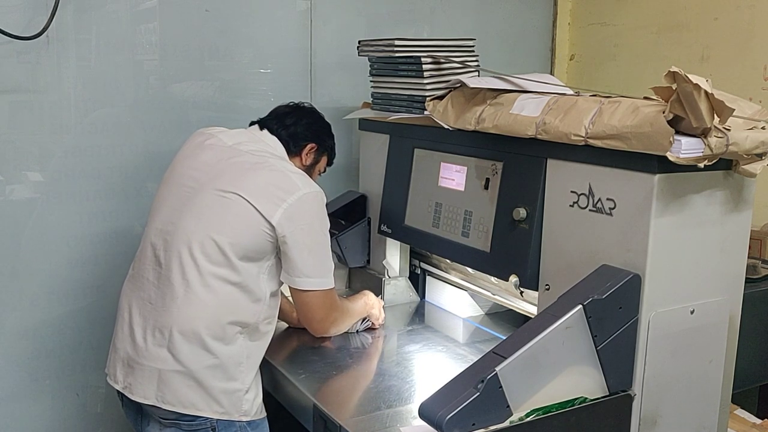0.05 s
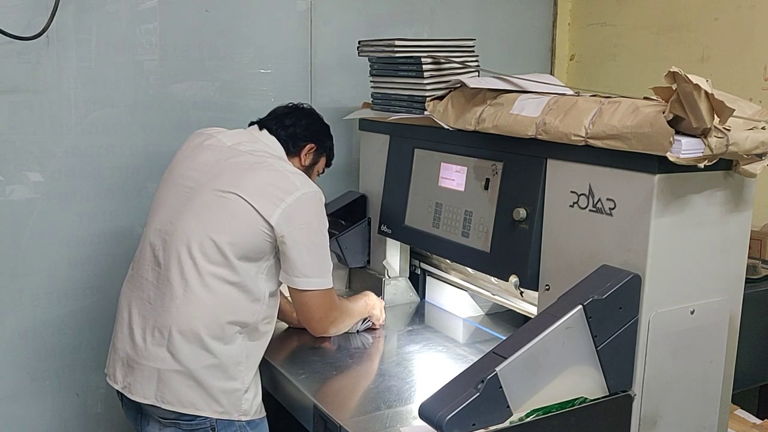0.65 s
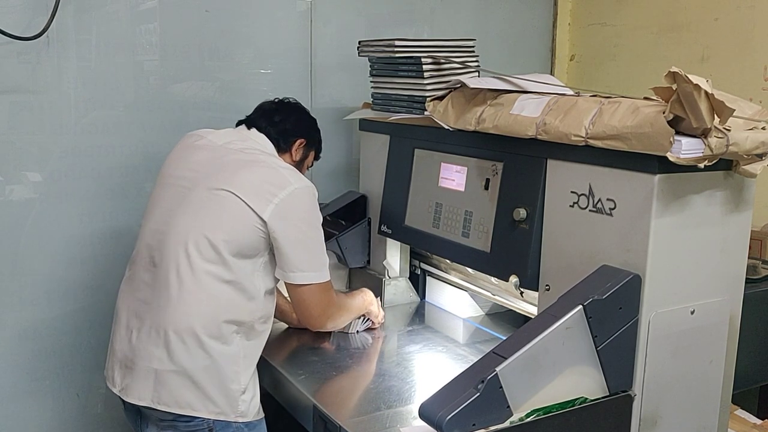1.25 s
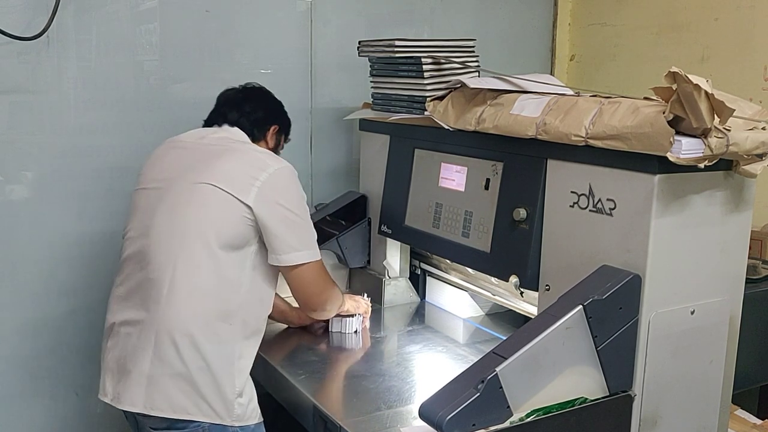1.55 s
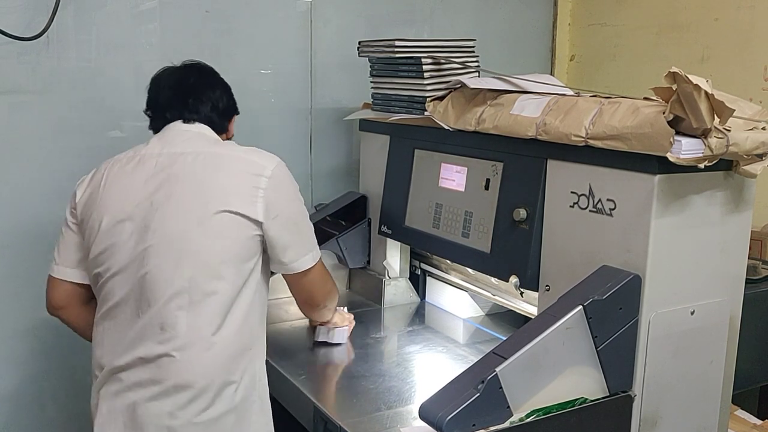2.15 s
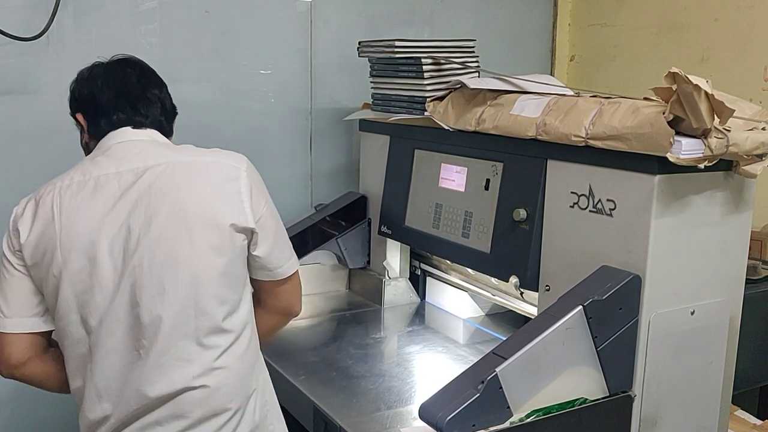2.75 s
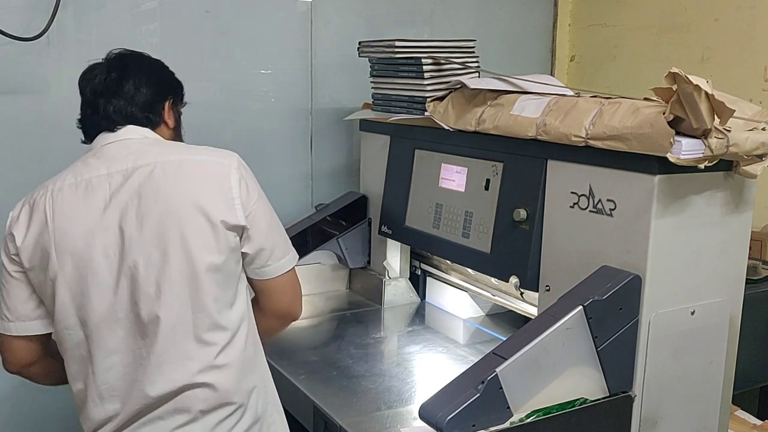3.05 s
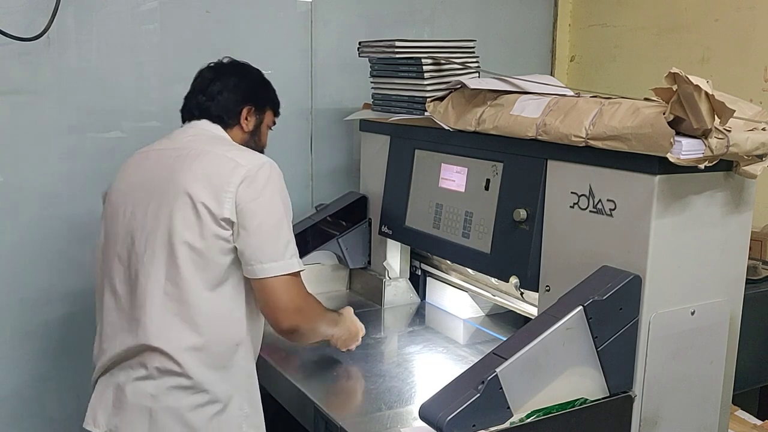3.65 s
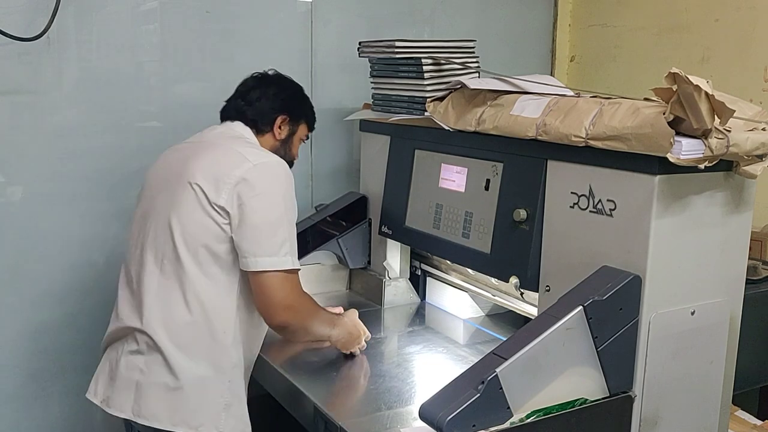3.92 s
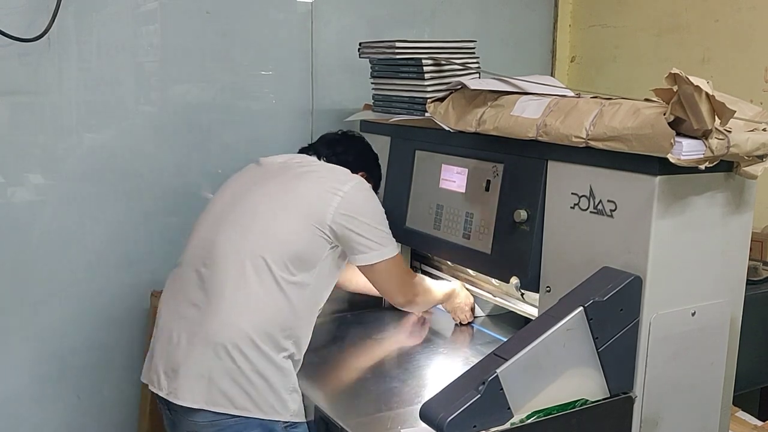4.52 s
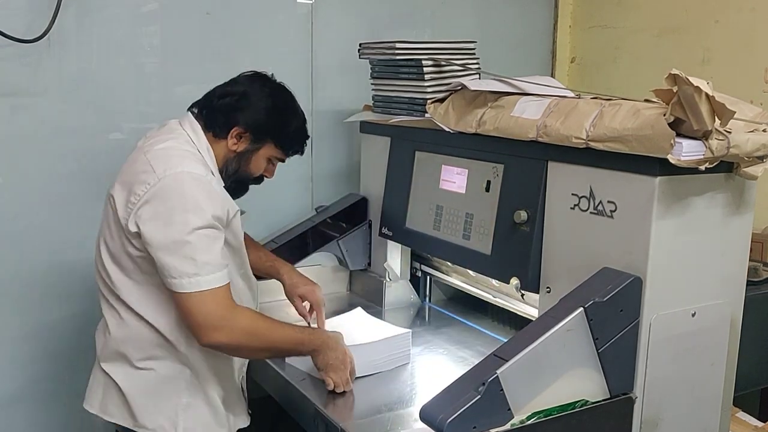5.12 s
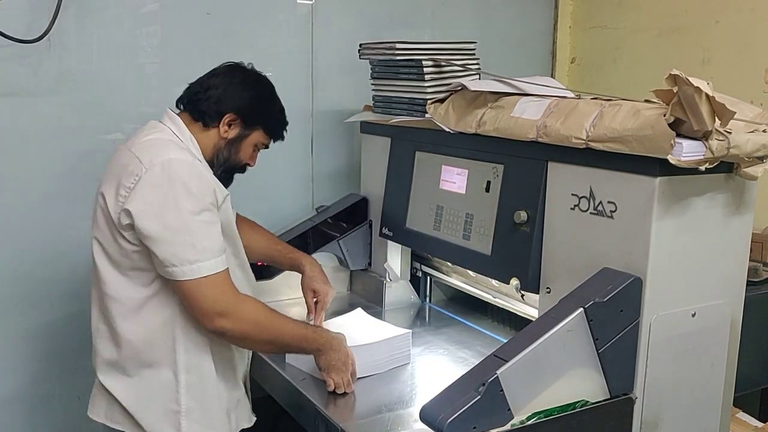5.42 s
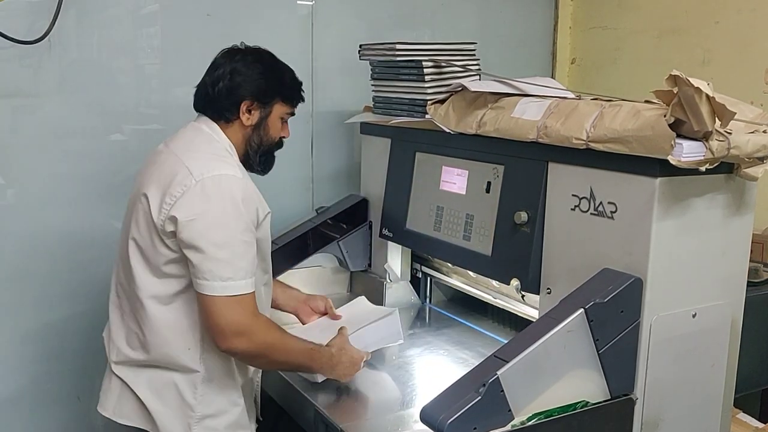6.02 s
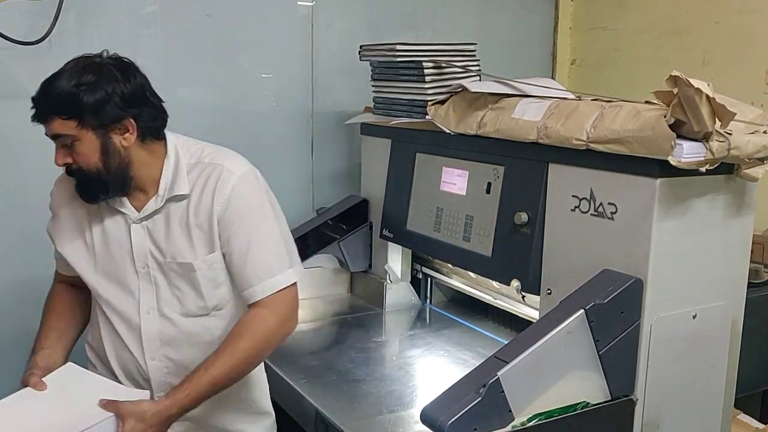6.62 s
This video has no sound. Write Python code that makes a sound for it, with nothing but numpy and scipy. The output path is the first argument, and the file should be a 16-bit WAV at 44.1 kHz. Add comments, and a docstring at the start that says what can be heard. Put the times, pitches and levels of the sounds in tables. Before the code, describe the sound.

A cutting machine's motor and fan hum throughout in a small, hard-walled room. After some soft rubbing, a block of paper slaps onto the steel table, which rings briefly. Another block is shoved across with a short scrape. Hands and sheets rustle lightly, then a thick stack is knocked twice on its edge, the second time harder, and brushes away as it is lifted. The sound is in stereo with a short echo.

```python
"""Paper blocks on a steel table

In a small, hard-walled print shop, a cutting machine's motor and fan hum throughout.
One block of paper is slapped onto its steel table, which rings; another is shoved across and scrapes.
A thick stack is gathered, knocked twice on its edge and lifted off. Hands and sheets rustle in between."""
import sys
import numpy as np
from scipy import signal
from scipy.fft import rfft, irfft, next_fast_len
from scipy.io import wavfile

SR = 44100
rng = np.random.default_rng(int(sys.argv[2]) if len(sys.argv) > 2 else 0)


def inscribe(sig):
    """Save sig as 16-bit PCM at rate SR to the path in sys.argv[1].

    A 1-D sig is mono; a 2-D sig holds one channel per row.
    Samples are clipped to [-1, 1] before scaling.
    """
    pcm = np.round(np.clip(np.atleast_2d(sig).T, -1, 1) * 32767)
    wavfile.write(sys.argv[1], SR, pcm.astype(np.int16))


N = 298597
TIME = np.arange(N) / SR
TOP_HZ, ROOM_FADE_S = 15900, 0.53   # a "fade" is the time a sound takes to drop by 60 dB
# how much left and right differ: (frequency [Hz], difference against what they share [dB])
STEREO_WIDTH = [(60, -20), (170, -17), (280, -12), (600, -6), (1100, 0), (4000, 0), (15000, 0)]

# the motor's tones: (frequency [Hz], level [dB])
MOTOR_TONES = [(120.2, -59), (157.5, -57), (240.2, -73.5), (296.6, -66), (549.5, -64), (740.7, -72.5)]
# a "colour" says how strong lows and highs are; fan and air: (frequency [Hz], relative level [dB])
FAN_COLOUR = [(15, -38), (25, -11), (92, -3.5), (162, -3), (182, -5.5), (310, -8), (555, -12), (694, -15),
              (756, -15), (1500, -28.5), (1950, -62), (3300, -120)]
AIR_COLOUR = [(880, -9.5), (1500, -4.5), (1620, -0.5), (2410, -5), (3350, -9), (3770, -10.5), (5660, -10.5),
              (8490, -20), (15200, -20), (16000, -25)]

# small contacts, snaps and rubs: (time [s], level [dB], centre [Hz], width [Hz], rise [s], fade [s])
TOUCH_EVENTS = [(0.3, -49, 446, 447, 0.14, 1.2), (0.868, -42, 275, 100, 0.073, 0.59),
                (1.32, -54, 1420, 600, 0.042, 0.6), (1.9315, -25, 6000, 2980, 0.00085, 0.027),
                (1.9383, -21.5, 5600, 3000, 0.0017, 0.021), (1.937, -35, 13600, 4110, 0.004, 0.07),
                (3.076, -55, 6800, 1000, 0.0075, 0.34), (3.724, -49, 13600, 4500, 0.015, 0.14),
                (3.974, -49.5, 1300, 900, 0.0068, 0.046), (4.216, -58.5, 6200, 2200, 0.016, 0.09),
                (5.095, -53, 1550, 500, 0.019, 0.15), (5.716, -40.5, 372, 35, 0.025, 0.067)]
# hands and sheets brushing: (time [s], rise [s], fade [s], level [dB], brightness [dB])
# brightness is below 0 for a flat hand, above 0 for sheet edges
BRUSH_STROKES = [(0.885, 0.038, 0.64, -59, -10), (1.315, 0.026, 0.98, -56, -4.5), (1.505, 0.021, 1, -58, 1),
                 (1.906, 0.034, 0.091, -34.5, 0.5), (2.92, 0.098, 0.95, -65, 3),
                 (3.074, 0.008, 0.28, -58.5, 10), (4.216, 0.012, 0.15, -65, 13),
                 (4.444, 0.02, 0.13, -49, 8.5), (4.92, 0.091, 1, -62.5, 6), (5.087, 0.037, 0.14, -43.5, -3),
                 (5.283, 0.015, 0.2, -54.5, -2), (5.31, 0.031, 0.32, -54.5, -1),
                 (5.46, 0.047, 0.24, -55.5, 1), (5.55, 0.015, 0.26, -61, 2),
                 (5.684, 0.032, 0.22, -54.5, -6), (5.8, 0.008, 0.1, -61.5, 8), (5.845, 0.018, 0.39, -61, 3),
                 (5.939, 0.0085, 0.15, -58, -6), (6.007, 0.022, 0.55, -56, -2),
                 (6.435, 0.034, 0.32, -44, 3.5), (6.555, 0.081, 0.36, -40, 3),
                 (6.71, 0.024, 0.084, -57, -9)]
# a stroke's dull body and its rustle: (frequency [Hz], relative level [dB])
BODY_COLOUR = [(88, -36), (150, -2), (242, -2.5), (582, 3.5), (697, -4), (866, -4.5), (1300, -10),
               (1690, -39), (2860, -120)]
RUSTLE_COLOUR = [(500, -30), (850, 2), (960, -9), (1050, -5), (1260, -5), (2480, -8), (3130, -10.5),
                 (3320, -10), (3680, -11.5), (5400, -10.5), (6740, -10.5), (9500, -37), (12400, -59),
                 (20900, -120)]
# the fine hiss of brushed or sliding paper: (frequency [Hz], relative level [dB])
HISS_COLOUR = [(4710, -14), (8000, -10), (10400, -7.5), (11200, -6), (12700, -6.5), (15000, -1),
               (16000, -4)]

# paper hitting the table: (time [s], level [dB], landing time [s], softness [0 flat slap to 1 gradual],
# contact fade [s], room echo [dB], table ring level [dB], place [0 middle to 1 front edge])
TABLE_BLOWS = [(1.9312, -18, 0.0085, 0.39, 0.29, -9.5, -20.5, 0.011),
               (3.555, -20.5, 0.009, 0.43, 0.38, -14, -26.5, 0.58),
               (6.099, -22.5, 0.0097, 0.42, 0.075, -31, -36, 0.49),
               (6.2233, -15.5, 0.0086, 1, 0.074, -33.5, -13.5, 0.93)]
# the four blows in turn: (frequency [Hz], relative level [dB])
SLAP_COLOUR = [(41, -67), (70, -41), (162, 7), (195, 7), (250, -11), (360, -5.5), (566, -12.5), (695, -1.5),
               (1000, -19), (1200, -11.5), (2370, -22), (6750, -15), (8860, -41.5), (14000, -35),
               (16000, -43)]
SHOVE_COLOUR = [(35, -50), (60, -12), (160, -3.5), (287, 1), (437, -17.5), (732, -8), (822, -6),
                (1220, -19), (1410, -12), (2840, -23), (6580, -30), (9350, -49), (14600, -39), (16000, -51)]
TAP_COLOUR = [(35, -35), (60, -12), (172, 9), (480, -8.5), (924, -4), (1580, -28), (2140, -20.5),
              (2900, -34), (3120, -29), (3850, -32), (6900, -33), (11500, -80), (16000, -101)]
KNOCK_COLOUR = [(29, -53), (50, -24), (180, 8.5), (450, -10.5), (545, 2.5), (822, -24.5), (997, 1),
                (1120, -14.5), (1740, -11), (1910, -19), (3030, -15), (3580, -29), (6550, -24.5),
                (8140, -51), (16000, -74)]
# the table's ringing tones: (frequency [Hz], fade [s], level hit mid-table [dB], level hit at edge [dB])
STEEL_TONES = [(158.3, 0.22, -17, -21), (175, 0.074, -25, 3), (187.7, 0.37, 2.5, -27.5),
               (302, 0.061, -16, -9), (359, 0.13, -1.5, -20.5), (409, 0.07, -27, -7.5),
               (547, 0.073, 0, -0.5), (604, 0.14, -9, -20), (698.4, 0.163, -4.5, -35.5),
               (913, 0.05, -19, -8.5), (1167, 0.25, -8.5, -45), (1257, 0.073, -6, -15.5),
               (1500, .08, -27.5, -18), (2128, 0.028, -11, -12.5), (2476, 0.028, -35.5, -7),
               (2986, 0.036, -22, -16), (6640, 0.049, -28, -20.5)]

# the sliding block's rumble and scrape: (frequency [Hz], relative level [dB])
RUMBLE_COLOUR = [(71, -39), (120, -6.5), (157, 0), (231, -11.5), (289, 0), (324, 1.5), (475, -8), (552, -4),
                 (625, -8), (708, -8.5), (1000, -12.5), (1300, -39), (2200, -120)]
SCRAPE_COLOUR = [(410, -29), (700, -5), (924, -6.5), (1210, -8), (1480, -5), (1560, -14), (1700, -8),
                 (2600, -12.5), (4150, -12), (5130, -13.5), (5540, -12.5), (6930, -14.5), (8280, -28),
                 (10000, -37), (13000, -59), (22000, -120)]
# its rumble, scrape and hiss in turn: (level at full speed [dB], power the speed is raised to)
SLIDE_LAYERS = [(-28, 2.37), (-30, 2.05), (-46.5, 2.1)]


def amp(db):
    """Turn decibels into a gain to multiply by."""
    return 10 ** (np.asarray(db) / 20)


def at_hz(points, hz):
    """Read between a table's points, with octaves evenly spaced."""
    known, values = np.transpose(points)
    return np.interp(np.log(np.maximum(hz, 1)), np.log(known), values)


def drift(rate):
    """A random wobble of typical size 1, with `rate` new values a second."""
    knots = rng.standard_normal(4096)
    wobble = np.interp(TIME * rate, np.arange(len(knots)), knots)
    return wobble / np.sqrt(np.mean(wobble ** 2) + 1e-20)


def stereo(mid, side, hz):
    """Make left and right: alike in the bass, unrelated in the treble."""
    return mid + side * amp(at_hz(STEREO_WIDTH, hz)) * np.array([[1], [-1]])


def noise(colour, grain_db=0):
    """Coloured stereo noise of size 1; grain roughens it into clumps of tiny slips."""
    size = next_fast_len(N)
    hz = np.fft.rfftfreq(size, 1 / SR)
    slips = rng.standard_normal((2, N)) * amp(grain_db * (drift(900) + .5 * drift(130)))
    mid, side = rfft(slips, size) * amp(at_hz(colour, hz)) * (hz < TOP_HZ)
    out = irfft(stereo(mid, side, hz), size)[:, :N]
    return out / np.std(out.mean(axis=0))


def band_pass(sound, low, high):
    """Keep what lies between two frequencies."""
    return signal.sosfilt(signal.butter(2, [low, high], "band", fs=SR, output="sos"), sound)


def match_energy(sound, shape):
    """Give each channel the same energy as the loudness shape."""
    return sound * np.sqrt(np.sum(shape ** 2) / np.sum(sound ** 2, axis=1, keepdims=True))


def swell(t, rise, fade):
    """Grow to 1 over the rise time, then die away."""
    return np.sin(np.pi / 2 * np.clip(t / rise, 0, 1)) ** 2 * amp(-60 * np.clip((t - rise) / fade, 0, 2))


def add(out, start_s, sound):
    """Mix a short sound in at its time."""
    start = round(start_s * SR)
    out[:, start:start + sound.shape[-1]] += sound[..., :N - start]


def machine_hum(fan_db=-48.5, air_db=-64.5, waver_db=1.5, middle_start_db=2.5, sink_db_per_s=0.84):
    """The fan rushes, air hisses and the motor's tones waver; the middle range slowly gets quieter."""
    out = amp(fan_db) * noise(FAN_COLOUR) + amp(air_db) * noise(AIR_COLOUR)
    for hz, db in MOTOR_TONES:
        phase = 2 * np.pi * hz * TIME + 0.51 * drift(9.2)   # the pitch wanders a little
        out += np.sqrt(2) * amp(db + waver_db * drift(5.2)) * stereo(np.sin(phase), np.cos(phase), hz)
    middle = signal.sosfiltfilt(signal.butter(1, [190, 4000], "band", fs=SR, output="sos"), out)
    return out + middle * (amp(middle_start_db - sink_db_per_s * TIME) - 1)


def touches():
    """Each small contact stirs one resonance, heard as a short band of noise."""
    out = np.zeros((2, N))
    for start_s, db, hz, width_hz, rise, fade in TOUCH_EVENTS:
        low, high = hz / (1 + width_hz / hz / 2), min(hz + width_hz / 2, TOP_HZ)
        shape = swell(TIME[:SR], rise, fade)
        steady = band_pass(rng.standard_normal((2, 2 * SR)), low, high)[:, SR:]
        rub = match_energy(steady * shape, shape)
        add(out, start_s, amp(db) * stereo(*rub, hz))
    return out


def brushes(body_db=1.5, hiss_db=-17):
    """Skin strokes paper: a dull body, the rustle of the sheets and a fine hiss from their edges."""
    gains = np.zeros((3, N))
    for start_s, rise, fade, db, bright_db in BRUSH_STROKES:
        shares_db = np.array([body_db - 0.9 * bright_db, 0, hiss_db + bright_db])
        add(gains, start_s, amp(db + shares_db)[:, None] * swell(TIME[:SR], rise, fade))
    colours = [BODY_COLOUR, RUSTLE_COLOUR, HISS_COLOUR]
    return sum(gain * noise(colour, grain_db=1.0) for gain, colour in zip(gains, colours))


def sheets_landing(t, colour, landing, softness, fade, echo_db, crackle_db=3.5):
    """The sheets meet the steel in a quick, uneven crowd of slaps; the room carries them on."""
    edges = np.geomspace(445, TOP_HZ + 400, 29) - 400   # 28 bands, wider towards the top
    slaps = rng.standard_normal((2, 2, len(t)))
    slaps *= amp(crackle_db * drift(703)[:len(t)] * np.exp(-t / (3 * landing)))   # roughest at first
    attack = np.clip(t / landing, 0, 1) ** softness
    fading_s = np.maximum(t - 1.32 * landing, 0)
    out, power = 0, 0
    for k, (low, high) in enumerate(zip(edges, edges[1:])):
        hz = (low + high) / 2
        contact = amp(-60 * fading_s / (fade * (1000 / hz) ** 0.028))   # lows last a little longer
        room_fade = ROOM_FADE_S / np.hypot(1, (hz / 11000) ** 2)   # air and paper soak up the top
        echo = amp(echo_db - 60 * fading_s / room_fade)
        shape = attack * np.hypot(contact, echo)
        band = match_energy(band_pass(slaps[k % 2] * shape, low, high), shape)
        dip_db = -8 * np.exp(-((hz - 170) / 60) ** 2)   # the table's lowest tones take this energy
        gain = amp(at_hz(colour, hz) + dip_db) * np.sqrt(high - low)
        out += gain * stereo(*band, hz)
        power += gain ** 2
    return out / np.sqrt(power)


def table_ring(t, rise, place):
    """The steel's tones build up as the paper lands; where it lands sets how strong each is."""
    out = 0
    for hz, fade, middle_db, edge_db in STEEL_TONES:
        # the whole block drives the low tones in step, single sheets the high ones
        scatter = min(1, (hz / 500) ** 2)
        phase = 2 * np.pi * (hz * (t - rise) + scatter * rng.uniform(-0.34, 0.45))
        tone = stereo(np.sin(phase), np.cos(phase) * rng.choice([-1, 1]), hz)
        out += amp(middle_db + place * (edge_db - middle_db)) * swell(t, rise, fade) * tone
    return out


def blows():
    """Each block claps on the table and sets it ringing."""
    out, t = np.zeros((2, N)), TIME[:SR * 2 // 3]
    for blow, colour in zip(TABLE_BLOWS, [SLAP_COLOUR, SHOVE_COLOUR, TAP_COLOUR, KNOCK_COLOUR]):
        start_s, db, landing, softness, fade, echo_db, ring_db, place = blow
        add(out, start_s, amp(db) * sheets_landing(t, colour, landing, softness, fade, echo_db))
        add(out, start_s, amp(ring_db) * table_ring(t, rise=1.25 * landing, place=place))
    return out


def slide(start_s=3.534, rise_s=0.03, slowing_per_s=1.84, stop_s=3.983, fade_s=0.088):
    """The shoved block sticks and slips, quieter as friction slows it, until it stops short."""
    t = TIME - start_s
    speed = np.clip(1 - slowing_per_s * t, 0, 1)
    moving = np.sin(np.pi / 2 * np.clip(t / rise_s, 0, 1)) ** 2
    moving *= amp(-60 * np.clip((TIME - stop_s) / fade_s, 0, 2))
    layers = noise(RUMBLE_COLOUR), noise(SCRAPE_COLOUR, grain_db=0.5), noise(HISS_COLOUR, grain_db=1.5)
    return moving * sum(amp(db) * speed ** power * x for (db, power), x in zip(SLIDE_LAYERS, layers))


def scene(hum_pan_db=0.28):
    """All the handling over the hum, which sits a little to the right."""
    pan = amp(hum_pan_db * np.array([[-1], [1]]))
    return blows() + slide() + brushes() + touches() + machine_hum() * pan


def record(dry, bass_cut_hz=32):
    """The microphone softens the deep bass; the very top is cut steeply."""
    thinned = signal.sosfilt(signal.butter(1, bass_cut_hz, "high", fs=SR, output="sos"), dry)
    return signal.sosfilt(signal.ellip(12, .1, 80, TOP_HZ, fs=SR, output="sos"), thinned)


dry = scene()
out = record(dry)
inscribe(out)
```